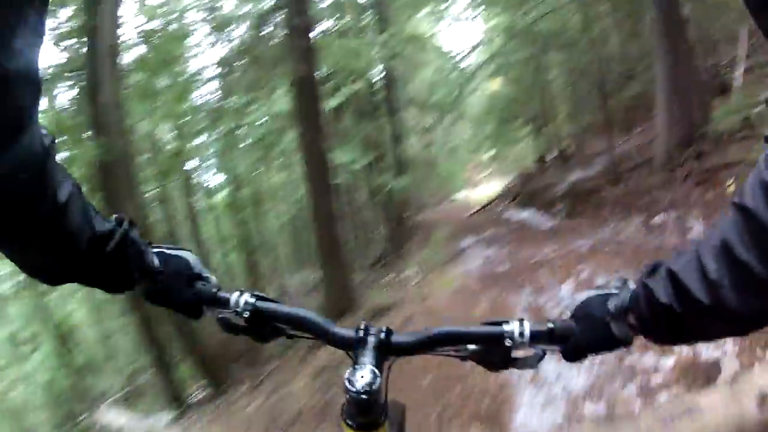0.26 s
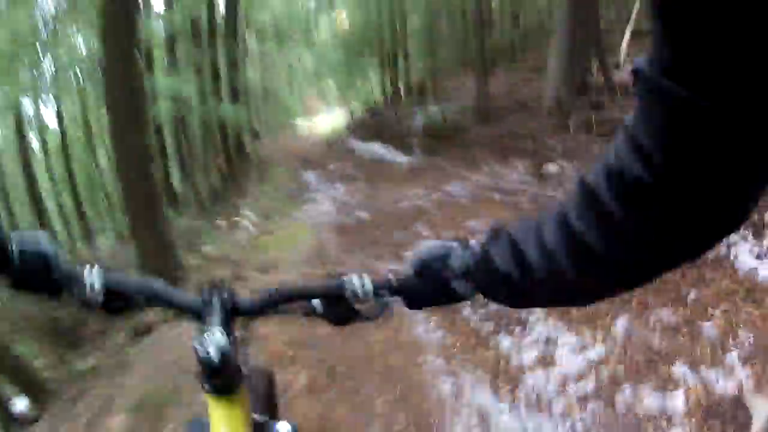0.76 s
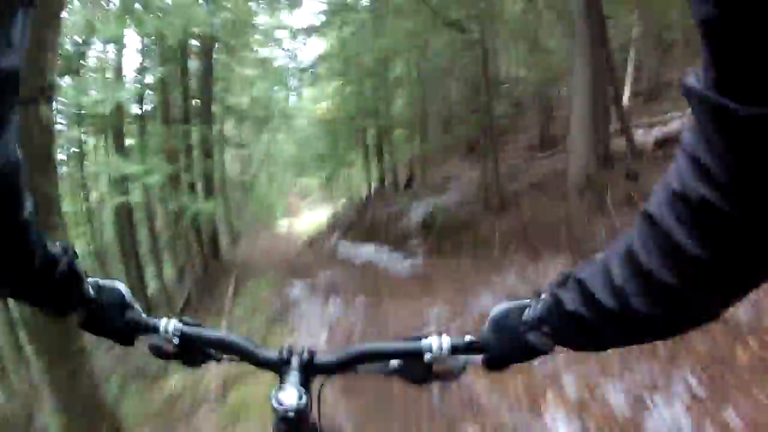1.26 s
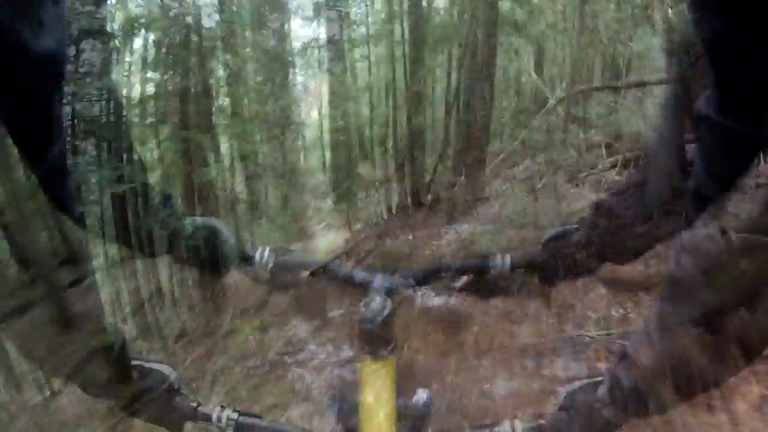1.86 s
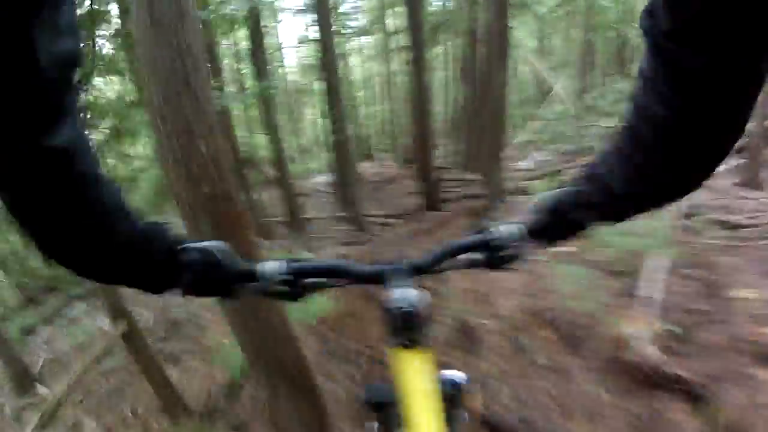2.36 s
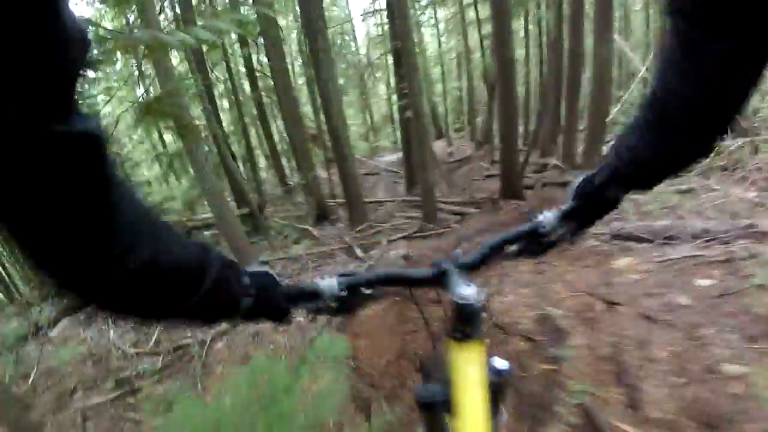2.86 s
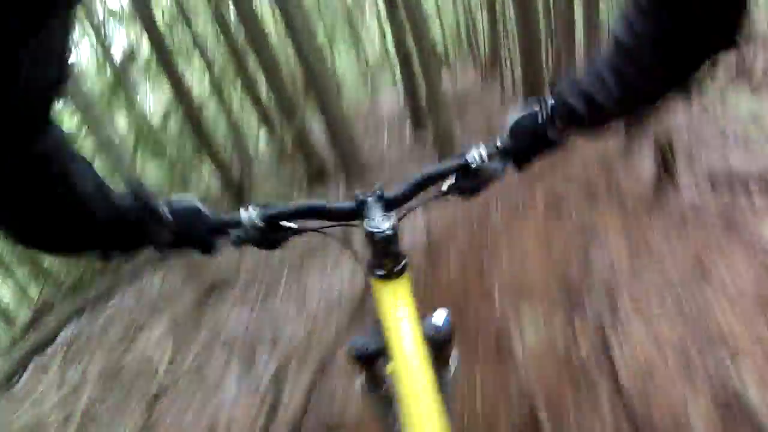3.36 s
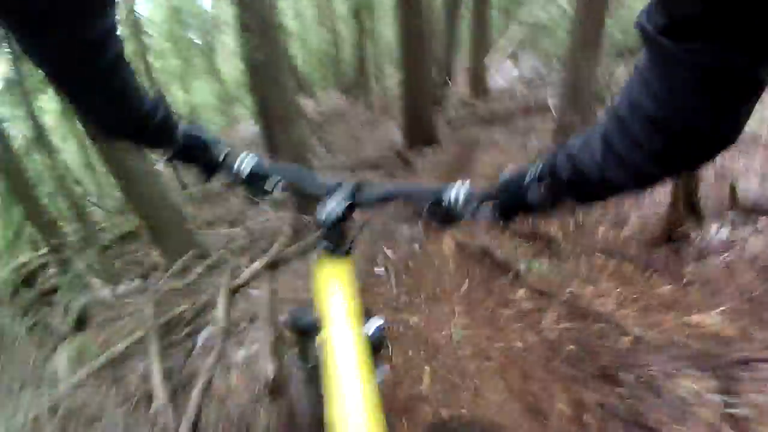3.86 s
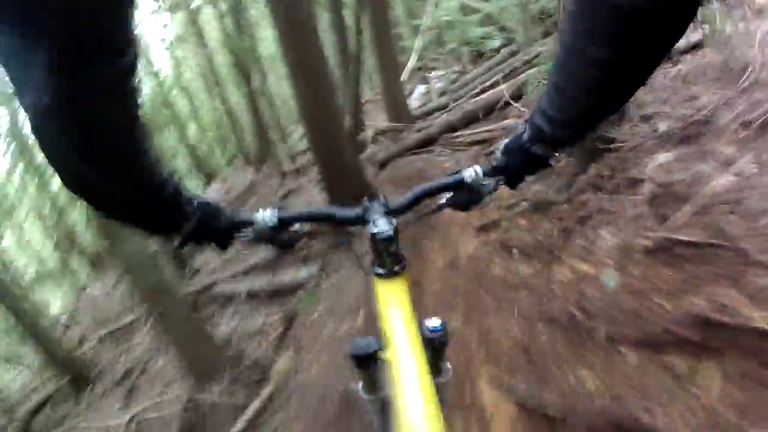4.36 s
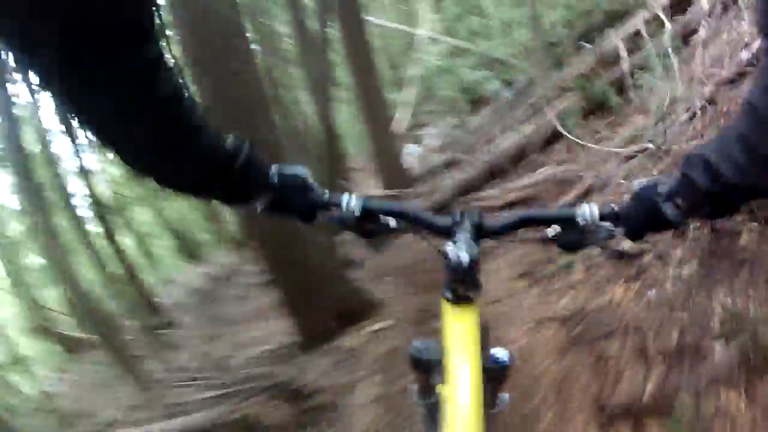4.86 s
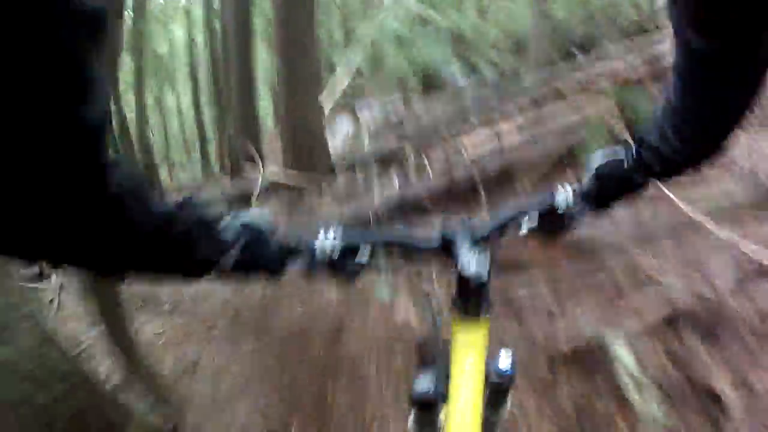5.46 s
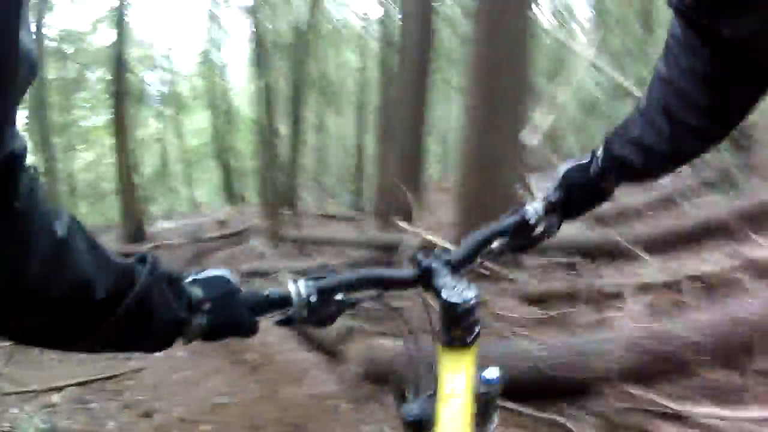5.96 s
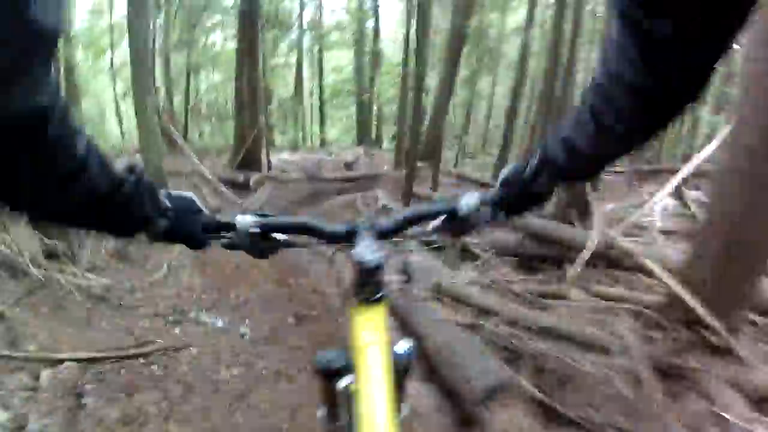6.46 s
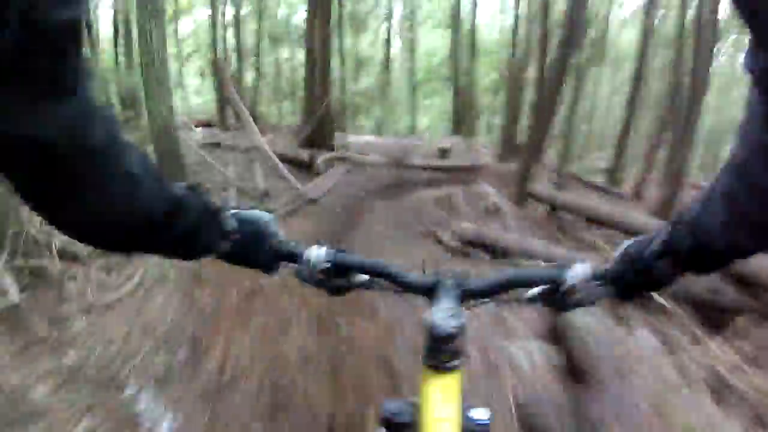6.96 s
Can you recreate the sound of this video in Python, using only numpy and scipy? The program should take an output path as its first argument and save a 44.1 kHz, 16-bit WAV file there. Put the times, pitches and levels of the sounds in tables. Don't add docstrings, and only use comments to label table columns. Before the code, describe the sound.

Muffled, boxy knocks, short cloth scrapes and tiny metallic ticks over soft ground rumble while a mountain bike jolts across dirt and roots.

```python
import sys
import numpy as np
from scipy import signal
from scipy.fft import rfft, irfft, next_fast_len
from scipy.io import wavfile
from scipy.ndimage import uniform_filter1d, map_coordinates

SR = 44100
rng = np.random.default_rng(int(sys.argv[2]) if len(sys.argv) > 2 else 0)


def to_wav(s):
    ch = np.atleast_2d(s).T
    pcm = np.round(np.clip(ch, -1, 1) * 32767)
    wavfile.write(sys.argv[1], SR, pcm.astype(np.int16))


def elevation(decibels):
    levels = np.asarray(decibels, float)
    return 10 ** (levels / 20)


N = 317961

# (pitch [Hz], width [Hz], level [dB])
MID_WALL = [(1768, 176, 0)]
LOW_WALL = [(582, 204, -8.5), (1070, 277, 3.5), (1392, 85, -1)]
UPPER_WALL = [(2016, 210, -1), (2540, 3000, -6.5)]
STRUCK_HIGH_WALL = [(3610, 305, 5), (4190, 1500, -7), (4750, 720, -9.5)]
# (pitch [Hz], width [Hz], level [dB])
PADDED_WALLS = [
    [(1798, 146, 0)],
    [(1143, 270, 0)],
    [(2250, 120, -1.5), (2590, 170, -7)],
    [(3480, 340, 0)],
]
PAD_SIDES = [-1, -1, 1, 1]
# (pitch [Hz], width [Hz], level [dB])
CLOTHED_MID_WALL = [(1890, 414, -0.5), (2124, 197, 2), (2498, 233, 0.3)]
SCRAPED_HIGH_WALL = [(3470, 180, 0), (3760, 230, -10), (3190, 150, -14.5), (5250, 230, -23)]
# (pitch [Hz], width [Hz], level [dB])
SHELL = [(290, 110, -1.5), (430, 88, -4), (663, 82, -5)]
# (pitch [Hz], width [Hz], level [dB])
DEAD_SPOTS = [(967, 390, -14.5), (1396, 92, 1), (2736, 590, -17), (4260, 780, -31)]

# (time [s], middle wall peak [dB], low wall above it [dB], upper wall above it [dB], contact [ms])
SLAMS = [
    (0.9635, -24, -6, 2, 2),
    (1.2981, -17, -12, 6, 0.92),
    (2.5472, -10, -4, -19, 1.8),
    (4.787, -12, -2, -10, 1.46),
    (5.1898, -13.5, -1, -19, 2.6),
    (5.4113, -21, 2, -9, 1.4),
]
# (time [s], middle wall peak [dB], low wall above it [dB], high wall above it [dB])
CLACKS = [(0.9602, -19, 0.5, -41), (1.2801, -26, 0.5, -23), (1.514, -29, -4.5, -11),
          (2.3599, -14.5, -4, -20.5), (2.8086, -23.5, 1, -16), (2.977, -29.5, 3, -24),
          (3.0762, -39, 6, -24), (3.3278, -14.5, -3, -22), (3.5362, -26, -7, -18), (3.6438, -42, -13, -9),
          (4.021, -44.5, -5, -2), (4.17, -14, -3, -28), (4.337, -13, -4, -19), (4.547, -9.5, -5.5, -23.5),
          (4.804, -29, -8, -21), (4.816, -35, 2, -16), (6.185, -33, 3.5, -39), (6.6767, -19, -5, -16),
          (6.691, -11, -4, -13), (6.853, -38.5, 4, -6)]
# (time [s], middle wall peak [dB], low wall above it [dB])
SHOVES = [
    (1.2943, -23.5, 3.5),
    (1.9432, -32.5, 4.5),
    (2.8408, -28.5, 1),
    (3.4466, -29.5, 3.5),
    (3.5311, -27, 4.5),
    (6.4883, -27, 1),
]
SHOVE = -0.61, -16, 3.2
# (time [s], middle wall peak [dB], low wall above it [dB])
NUDGES = [(0.564, -52, 10), (0.85, -40.5, 10.5), (1.7656, -62, 16), (2.5154, -46, 6), (2.5734, -40, 2),
          (2.92, -52, 14), (3.02, -43, 1), (3.4824, -35, 7.5), (4.2998, -42, 5.5), (4.4008, -48, 19.5),
          (4.643, -42.5, 3), (5.037, -40, 8.5), (5.07, -49, 13.5), (5.419, -40.5, 16.5), (5.464, -34.5, 3),
          (5.542, -43, 8.5), (5.612, -39.5, 7), (5.6783, -46.5, 15), (5.9526, -35.5, -2), (6.102, -44, 9),
          (6.648, -47.5, 10.5), (6.7708, -45, 8.5), (6.8602, -41, 6.5), (6.9113, -46.5, 7.5),
          (6.9828, -36, 0.5)]
NUDGE = -21, -7, 2.46
# (time [s], middle wall peak [dB], high wall above it [dB])
SNAPS = [(1.0176, -49, 12), (1.109, -54.5, 10), (1.1765, -53.5, 11), (1.2315, -46.5, 13.5),
         (1.2483, -54.5, 27.5), (1.37, -53, 8.5), (1.4483, -54, 13), (2.3883, -48, 1), (2.99, -58, 16),
         (3.1017, -46, 5.5), (3.363, -40.5, 5.5), (3.43, -52.5, 13), (5.1071, -50.5, 8.5), (5.796, -68, 15)]
STRUCK_TIMES = [1.2327, 1.2485, 1.2975, 1.9445, 2.5468, 4.787, 5.1899, 5.4114, 0.9638, 3.3278, 6.4883,
                1.2984, 5.03]
# (pitch [Hz], peak [dB], T60 [s])
STRUCK_MODES = [
    [(2980, -16.5, 0.0052)],
    [(5200, -48, 0.044)],
    [(1670, -32, 0.011), (3820, -34, 0.011), (5300, -19, 0.012)],
    [(670, -31.5, 0.047), (2020, -22, 0.018)],
    [(1750, -2.5, 0.022), (2055, -3, 0.02), (3550, -9, 0.017), (1360, -12.5, 0.04), (4900, -7, 0.0089),
     (4620, -23, 0.01), (5600, -37, 0.0057), (3020, -36, .012), (314, -33, 0.027), (1126, -6, 0.024),
     (610, -29, 0.059)],
    [(1680, -3.5, 0.012), (1206, -17.5, .03), (2070, -9, 0.026), (5300, -36, .012), (770, -17, 0.02)],
    [(1098, -18, 0.054), (1264, -13, 0.039), (2010, -12, 0.024), (1570, -4.5, 0.014), (2196, -30, 0.022),
     (680, -31, 0.045), (3580, -11, 0.014), (3050, -39, .02), (5200, -31, .014), (5400, -32, .011),
     (352, -20, .025)],
    [(498, -25.5, 0.03), (384, -37, 0.036), (1590, -17, 0.015), (2000, -24, .02)],
    [(1900, -28, 0.015)],
    [(430, -32, 0.03)],
    [(444, -33, 0.023)],
    [(114, -9.5, 0.055), (227, -16, 0.036), (2218, -11.5, 0.024), (3585, -33, 0.04)],
    [(420, -34.5, 0.092)],
]
# (pitch [Hz], T60 [s], level under the low wall [dB])
LID = [(640, 0.037, -21), (1309, 0.089, -31), (1750, 0.012, -12), (5140, 0.0093, -19.5)]
# (time [s], level [dB])
EDGES = [(0.8508, -41), (1.514, -32), (1.9432, -40), (2.8408, -35), (3.3278, -44), (3.4293, -39),
         (3.4466, -44), (6.185, -46), (6.4883, -47), (6.6767, -26), (6.691, -25), (6.853, -44),
         (4.4563, -46), (5.4645, -46)]

# (time of the peak [s], peak [dB], pitch [Hz])
THUMPS = [(0.567, -25, 185), (0.679, -28.5, 216), (0.857, -29, 211), (0.963, -19, 195), (0.968, -29, 179),
          (1.2992, -19, 232), (1.769, -26.5, 199), (2.361, -32, 332), (1.945, -24, 242), (2.519, -29, 217),
          (2.549, -11.5, 312), (2.979, -29.5, 115), (3.048, -23.5, 217), (3.447, -25, 240),
          (3.468, -30, 171), (3.533, -23, 227), (3.541, -24, 205), (4.404, -24.5, 218), (4.55, -26.5, 230),
          (4.766, -29.5, 136), (4.789, -15, 213), (4.817, -27, 242), (5.193, -21, 282), (5.415, -27, 290),
          (5.467, -25.5, 200), (6.102, -25, 180), (6.492, -26.5, 187), (6.677, -17, 198),
          (6.861, -27.5, 236), (6.987, -23, 176)]
# (time of the peak [s], peak [dB], pitch [Hz])
LANDING = [
    (1.268, -27, 167),
    (1.286, -20, 130),
    (1.3019, -11, 165),
]
# (time of the peak [s], peak [dB], pitch [Hz])
PATTER = [(0.139, -45.5, 192), (0.38, -47.5, 164), (0.534, -41.5, 200), (0.8, -33.5, 197),
          (1.708, -41, 150), (2.041, -57, 200), (2.153, -42.5, 260), (2.205, -34, 170), (2.219, -37.5, 169),
          (2.267, -46, 200), (2.4, -34, 201), (2.942, -46, 302), (3.02, -34, 240), (3.401, -40, 200),
          (3.49, -28.5, 170), (3.702, -41, 201), (3.883, -39, 173), (4.171, -30.5, 256), (4.236, -47, 198),
          (4.276, -31.5, 202), (4.458, -34.5, 202), (4.505, -39, 202), (4.677, -39, 250), (4.7, -45, 250),
          (4.711, -36, 248), (4.822, -30.5, 151), (5.941, -41, 199), (6.403, -39.5, 202), (7.119, -42, 200)]
BUMPS = [0.736, 1.33, 1.515, 2.81, 2.844, 2.951, 3.079, 3.097, 3.327, 3.8, 4.339, 4.377, 4.644, 5.039,
         5.074, 5.422, 5.527, 5.613, 5.7, 6.185, 6.734, 6.758, 6.777, 6.916]
# (time [s], peak [dB], pitch [Hz])
TICKS = [(3.1009, -53, 4810), (3.1173, -31, 5200), (3.3137, -38, 5270), (3.4017, -40, 5700),
         (3.2081, -48, 4740), (3.44, -50, 5730), (3.466, -50, 5700), (3.486, -51, 4900), (3.558, -38, 5680),
         (3.58, -58, 5250), (3.634, -45, 5100), (3.5528, -30.5, 5110), (3.6326, -37, 5700),
         (3.7214, -38, 5720), (3.7784, -55, 5570), (3.8362, -45, 4890), (4.121, -38, 5330),
         (4.3271, -37, 5200), (4.5694, -49, 4700), (4.9736, -45, 5230), (5.662, -41, 5130),
         (5.776, -45, 5200), (4.4563, -43, 5300), (5.7932, -43, 4820), (5.797, -43, 5330),
         (6.6059, -60, 4860), (6.624, -41, 5200), (7.0698, -42, 4540)]

# (time [s], length [s], level [dB])
BRUSHES = [(0.265, 0.043, -51), (0.303, 0.044, -48), (0.543, 0.016, -41), (0.612, 0.045, -34.5),
           (0.69, 0.062, -37), (0.752, 0.035, -42.5), (0.951, 0.092, -48), (1.133, 0.02, -49),
           (2.196, 0.028, -44.5), (3.081, 0.02, -48), (3.363, 0.02, -50), (3.695, 0.025, -49),
           (3.888, 0.022, -42.5), (4.353, 0.034, -43), (4.56, 0.03, -46.5), (6.039, 0.051, -47.5),
           (6.108, 0.026, -47), (6.215, 0.069, -69), (6.399, 0.036, -35.5), (6.515, 0.044, -48),
           (6.657, 0.014, -53), (6.7, 0.0049, -65), (7.071, 0.033, -49.5), (7.17, .1, -47.5)]
# (time [s], length [s], level [dB])
RUBS = [(0.375, 0.12, -54.5), (2.404, 0.023, -47), (3.035, 0.018, -39), (3.181, 0.055, -44),
        (3.47, 0.04, -37.5), (3.523, 0.086, -54), (3.771, 0.043, -41), (4.445, 0.039, -42.5),
        (4.738, 0.053, -43.5), (6.154, 0.035, -43), (6.292, 0.061, -55), (6.378, 0.022, -45),
        (6.843, 0.049, -44), (6.955, 0.026, -48)]
# (time [s], length [s], level [dB])
DRAGS = [(0.871, 0.014, -54), (1.251, 0.061, -47), (1.608, 0.026, -52), (1.887, 0.02, -52.5),
         (2.726, 0.016, -51.5), (2.795, 0.01, -40), (2.928, 0.055, -39.5), (4.03, 0.015, -46.5),
         (4.169, 0.058, -47), (4.263, 0.061, -43), (4.66, 0.063, -39.5), (4.787, 0.025, -30.5),
         (5.022, 0.036, -43), (5.203, 0.029, -48.5), (5.294, 0.049, -49.5), (5.416, 0.015, -37.5),
         (5.475, 0.034, -48), (5.521, 0.033, -43.5), (5.679, 0.012, -39), (5.835, 0.017, -49.5),
         (5.937, 0.037, -53)]
# (time [s], level [dB])
TRAIL = [(0.0, -53.5), (0.26, -59.5), (0.56, -56), (0.7, -49), (0.82, -53), (1.47, -56.5), (1.83, -51.5),
         (2.47, -52), (2.81, -57), (3.55, -46.5), (3.97, -55), (4.26, -48), (4.75, -48), (5.0, -54),
         (6.12, -51.5), (6.22, -63.5), (6.7, -53), (7.21, -46.5)]
# (time [s], sway [dB], time to lose half [s])
LURCHES = [(0.4, -33, 0.01), (0.57, -37, 0.034), (0.72, -17.5, 0.024), (0.88, -32.5, 0.048),
           (1.38, -39, 0.21), (2.11, -47, 0.35), (2.49, -44, 0.049), (2.971, -21, 0.014), (3.25, -30, 0.36),
           (3.49, -11.5, 0.022), (3.93, -37, 0.099), (4.3, -26.5, 0.23), (4.68, -32, 0.083),
           (5.1, -37, 0.026), (5.48, -24, 0.01), (5.86, -34, 0.27), (6.14, -36, .05), (6.461, -25, 0.013),
           (6.681, -16, 0.0085), (6.82, -24, 0.13), (7.0, -29, 0.022)]
# (frequency [Hz], level per Hz [dB])
SWAY = [(10, -10), (25, 4), (45, -13), (70, -16), (100, -57)]
RUMBLE = [(29, -15.5), (50, -3.5), (76, -0.5), (138, -4), (362, -17.5), (483, -27), (788, -38.5),
          (1000, -36), (1300, -99), (2200, -120)]


def unit(x):
    return x / np.sqrt(np.mean(x ** 2) + 1e-20)


def place(out, s, sound):
    out[round(s * SR):][:len(sound)] += sound


def track(tail):
    return np.zeros(N + tail), np.arange(tail) / SR


def wobble(rate):
    knots = rng.standard_normal(int(N * rate / SR) + 4)
    return map_coordinates(knots, [np.arange(N) * rate / SR])


def filtered(x, response):
    m = next_fast_len(N + SR // 2)
    return irfft(rfft(x, m) * response(np.fft.rfftfreq(m, 1 / SR)), m)[:N]


def highpassed(x, corner_hz):
    return filtered(x, lambda f: (1j * f / (corner_hz + 1j * f)) ** 2)


def coloured(spectrum):
    hz, db = np.transpose(spectrum)
    noise = rng.standard_normal(N)
    return unit(filtered(noise, lambda f: elevation(np.interp(np.log(f + 1), np.log(hz), db))))


def impulse():
    return np.eye(1, N)[0]


def ring(x, modes):
    def body(f):
        total = 0
        for k, (hz, width, db) in enumerate(modes):
            total = total + (-1) ** k * elevation(db) * 1j * f * width / (hz * hz - f * f + 1j * f * width)
        return total
    return filtered(x, body) / np.abs(filtered(impulse(), body)).max()


def contacts():
    knocks_list = [("slam", s, db, low, upper, -3, ms) for s, db, low, upper, ms in SLAMS]
    for s, db, low, high in CLACKS:
        knocks_list.append(("clack", s, db, low, -8.5 - 0.36 * low, high, 1.3))
    knocks_list += [("shove", s, db, low, *SHOVE) for s, db, low in SHOVES]
    knocks_list += [("nudge", s, db, low, *NUDGE) for s, db, low in NUDGES]
    knocks_list += [("snap", s, db, 0, 0.58 * high, high - 3.5, 4.3) for s, db, high in SNAPS]
    return knocks_list


def knocks():
    out, t = track(4096)
    t = t[:2048]

    def band(order, hz, kind="bandpass"):
        return signal.butter(order, hz, kind, fs=SR, output="sos")

    bare = np.array([ring(impulse(), wall)[:len(t)]
                     for wall in (MID_WALL, LOW_WALL, UPPER_WALL, STRUCK_HIGH_WALL)])
    bare[:3] = signal.sosfilt(band(4, [600, 2550]), bare[:3])
    padded = np.array([side * ring(impulse(), wall)[:len(t)] for side, wall in zip(PAD_SIDES, PADDED_WALLS)])
    padded[3] = signal.sosfilt(band(2, [2900, 4000]), padded[3])
    pad = band(3, [930, 2420])
    stiff = band(2, 950, "highpass")
    for kind, s, db, low_db, upper_db, high_db, ms in contacts():
        on_pad = kind == "clack"
        chatter = rng.standard_normal((4, len(t))) * np.exp(-t / (ms / 1000))
        blow = 5 if on_pad else 0.58
        chatter[:, 0] += blow * np.linalg.norm(chatter, axis=1)
        rung = signal.fftconvolve(chatter, padded if on_pad else bare, axes=1)
        if on_pad:
            rung[:3] = signal.sosfilt(pad, rung[:3])
        if kind == "slam":
            rung[1] = signal.sosfilt(stiff, rung[1])
        rung /= np.abs(rung).max(axis=1)[:, None]
        wall_db = db + np.array([3, low_db + 5.5, upper_db + 6.0, high_db + 5])
        place(out, s, elevation(wall_db) @ rung)
    return out[:N]


def struck():
    out, t = track(4096)
    onset = 1 - np.exp(-t / 0.00065)
    for s, modes in zip(STRUCK_TIMES, STRUCK_MODES):
        for hz, db, t60 in modes:
            place(out, s, elevation(db - 60 * t / t60) * onset * np.sin(2 * np.pi * hz * t))
    return out[:N]


def lid():
    out, t = track(4096)
    for s, db, low_db, *_ in SLAMS:
        ringing = np.zeros(len(t))
        for hz, t60, under_db in LID:
            mode_db = under_db + rng.normal(0, 0.93) - 60 * t / t60
            ringing += elevation(mode_db) * np.sin(2 * np.pi * hz * t)
        place(out, s, elevation(db + low_db) * (1 - np.exp(-t / 0.003)) * ringing)
    return out[:N]


def edges():
    out, t = track(512)
    for s, db in EDGES:
        burst = rng.standard_normal(len(t)) * np.exp(-t / 0.00097)
        place(out, s, elevation(db) * burst / np.abs(burst).max())
    return highpassed(out[:N], 1200)


def cracks():
    out, t = track(512)
    for s, db, high_db in SNAPS:
        burst = rng.standard_normal(len(t)) * np.exp(-t / 0.0005)
        place(out, s, elevation(db + high_db + 12) * burst / np.linalg.norm(burst) * 2)
    return highpassed(out[:N], 2200)


def thumps():
    out, t = track(4096)
    after = np.sin(2 * np.pi * 120 * t) * elevation(-60 * t / 0.072) * (1 - np.exp(-t / 0.0033)) ** 2
    bump_hz = 201.7
    bumps = [(s, -30, bump_hz) for s in BUMPS]
    faint_bumps = [(s, -32, bump_hz) for s in (1.59, 4.873, 6.7)]
    for s, db, hz in THUMPS + LANDING + PATTER + bumps + faint_bumps:
        side, edge = rng.standard_normal(2)
        if db > -24.7:
            side = 1 if (s, db, hz) in LANDING else -1
        hz = 0.91 * hz
        turns = t * hz
        swing = np.sin(2 * np.pi * turns) * np.exp(-turns / 0.39) * turns ** 0.81
        quick = np.sin(2 * np.pi * 1.72 * turns) * np.exp(-turns / 0.34) * np.tanh(edge)
        jolt = swing + 0.22 * quick + 0.062 * after
        place(out, s - 0.45 / hz, elevation(db + 16.5) * np.sign(side) * jolt)
    return out[:N]


def ticks():
    out, t = track(2048)
    onset = 1 - np.exp(-t / 0.0008)
    for s, db, hz in TICKS:
        place(out, s, elevation(db - 1 - 60 * t / 0.013) * onset * np.sin(2 * np.pi * hz * t))
    return out[:N]


def trail_db():
    s, db = np.transpose(TRAIL)
    return np.interp(np.arange(N) / SR, s, db)


def strokes():
    kinds = (BRUSHES, -22), (RUBS, -8.5), (DRAGS, 2.5)
    return [(*row, dull_db) for rows, dull_db in kinds for row in rows]


def grit(wall, rate, grain):
    grains = (rng.random(N) < rate / SR) * rng.standard_normal(N) * grain
    return unit(ring(rng.standard_normal(N) + grains, wall))


def patchy(x, depth_db):
    z = signal.stft(x, nperseg=256)[2]
    field = uniform_filter1d(rng.standard_normal(z.shape), size=3, axis=0)
    field = uniform_filter1d(field, size=14, axis=1)
    return signal.istft(z * elevation(depth_db * unit(field)), nperseg=256)[1][:N]


def scrape():
    t, dull = np.arange(N) / SR, np.zeros(N)
    bright = elevation(trail_db() + 1.0) * elevation([[0], [0], [-2.5]])
    tilt = np.array([[-0.3], [0], [0.4]])
    for s, length, db, dull_db in strokes():
        near = slice(max(round((s - 0.05) * SR), 0), round((s + length + 0.1) * SR))
        rise = 1 / (1 + np.exp((s - t[near]) / 0.0029))
        stroke = rise / (1 + np.exp((t[near] - s - length) / 0.0054))
        bright[:, near] += elevation(db - 1.0 - (dull_db + 17.0) * tilt) * stroke
        dull[near] += elevation(db + dull_db - 0.5) * stroke
    flutter = elevation(1.06 * wobble(45) + 0.98 * wobble(150))
    hiss = np.zeros(N)
    for wall, db, level in zip((LOW_WALL, CLOTHED_MID_WALL, SCRAPED_HIGH_WALL), (-8, -4, -8), bright):
        hiss += level * elevation(db + 2.0 * wobble(25)) * grit(wall, rate=400, grain=7.7)
    hiss = filtered(hiss, lambda f: elevation(-6 / (1 + (4150 / (f + 1)) ** 20)))
    return flutter * (patchy(hiss, depth_db=3) + 0.7 * dull * grit(SHELL, rate=110, grain=7.4))


def shake():
    t, ground_db = np.arange(N) / SR, trail_db()
    sway = elevation(-55.5) * np.ones(N)
    for s, db, half in LURCHES:
        sway += elevation(db - 6.0) * 2 ** (-np.abs(t - s) / half)
    sway_db = 20 * np.log10(sway)
    rumble_db = -48.5 + 0.56 * (ground_db - ground_db.mean()) + 0.39 * (sway_db - sway_db.mean())
    lumps = elevation(7 * np.tanh(wobble(30)) + 0.8 * wobble(12))
    return sway * coloured(SWAY) + elevation(rumble_db) * unit(lumps * coloured(RUMBLE))


def jingle():
    out, t = track(512)
    for when, pitch, size in rng.random((260, 3)):
        hz = 4500 + 1400 * pitch
        place(out, when * N / SR, elevation(-61 + 8 * size - 60 * t / 0.008) * np.sin(2 * np.pi * hz * t))
    return out[:N]


def scene():
    def gaps(f):
        response = 1
        for hz, width, db in DEAD_SPOTS:
            spring, loss = hz * hz - f * f, 1j * f * width
            response = response * (spring + loss * elevation(db)) / (spring + loss)
        return response
    case = filtered(knocks() + scrape(), gaps)
    blows = struck() + lid() + edges() + cracks() + thumps()
    return (case + blows + ticks() + shake() + jingle())[None]


def gain_control(x):
    over = (np.abs(x) > 0.62).astype(float)
    t = np.arange(SR // 4) / SR
    memory = signal.fftconvolve(over, (t > 0.006) * np.exp(-t / 0.012))[:N]
    return x * elevation(-5 * np.tanh(memory / 25))


def roll_off(x):
    return signal.sosfilt(signal.butter(12, 16510, fs=SR, output="sos"), x)


def record(dry):
    hold_hz, top_hz, edge_hz = 12000, 15330, 70
    slow = dry[0] + elevation(-60.0) * rng.standard_normal(N)
    slow = filtered(slow, lambda f: 1 / (1 + (f / 5750) ** 24))
    slow = gain_control(slow)
    slow = slow / (1 + np.abs(slow / 0.82) ** 20) ** (1 / 20)
    mirrored = slow * (1 + 2 * np.cos(2 * np.pi * hold_hz * np.arange(N) / SR))
    held = filtered(mirrored, lambda f: np.sinc(f / hold_hz) * elevation(-15 - 15.38 * np.tanh((f - top_hz) / edge_hz)))
    return roll_off(held[None])


dry = scene()
out = record(dry)
to_wav(out)
```